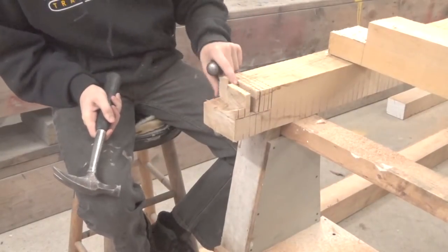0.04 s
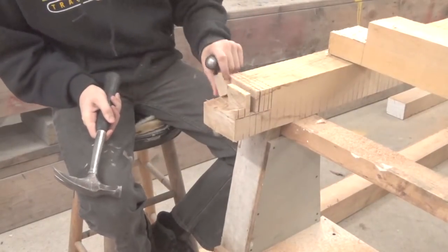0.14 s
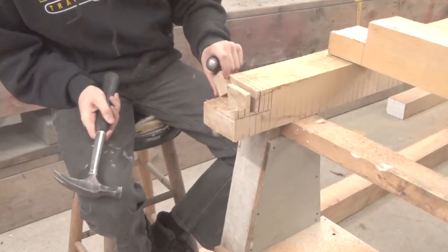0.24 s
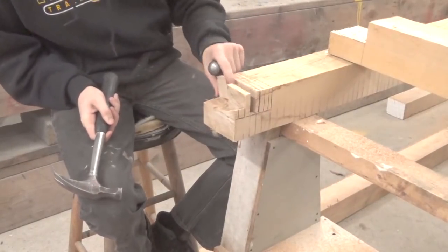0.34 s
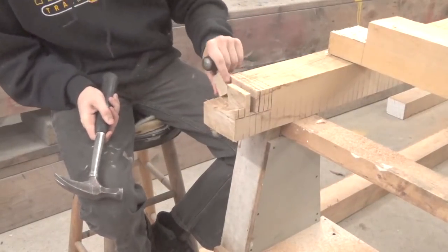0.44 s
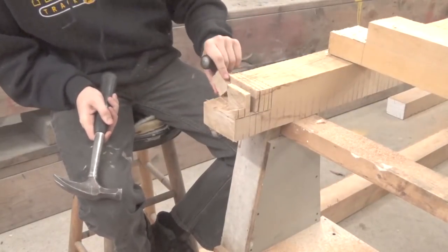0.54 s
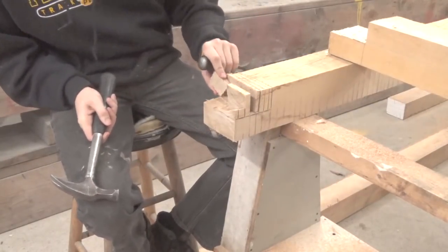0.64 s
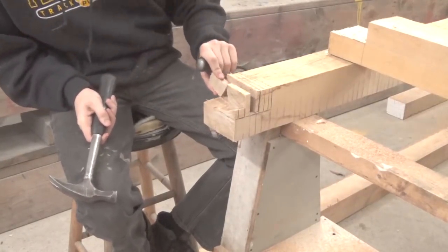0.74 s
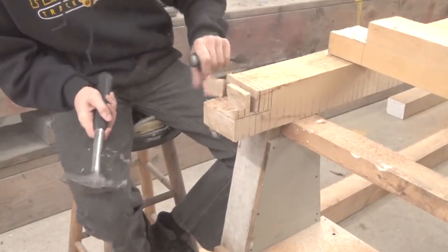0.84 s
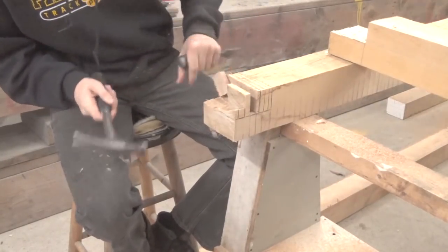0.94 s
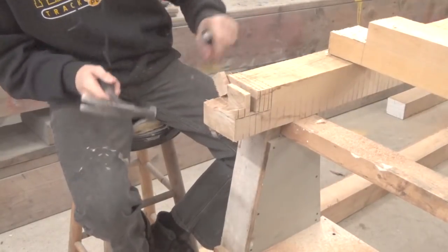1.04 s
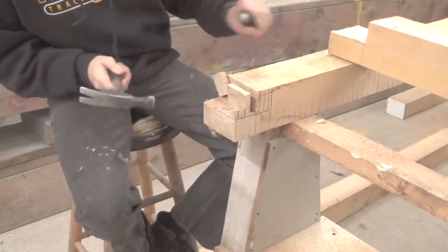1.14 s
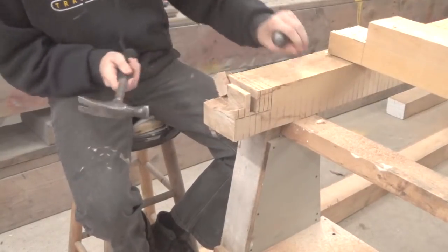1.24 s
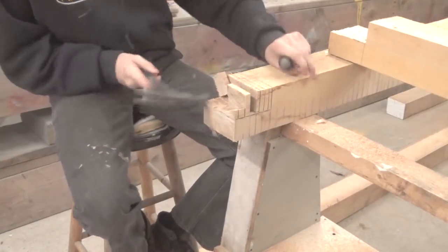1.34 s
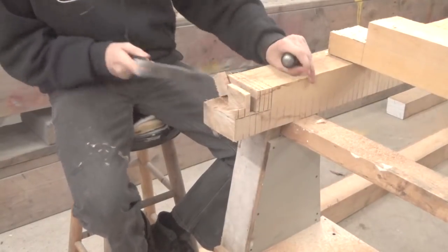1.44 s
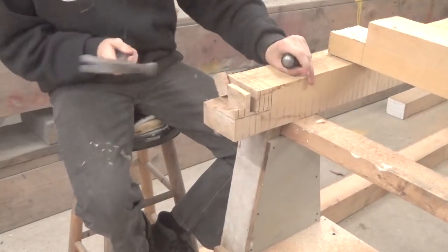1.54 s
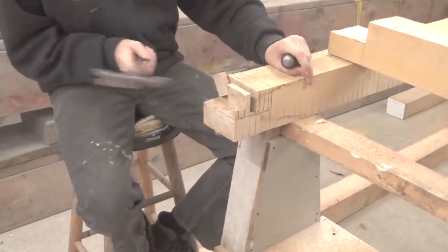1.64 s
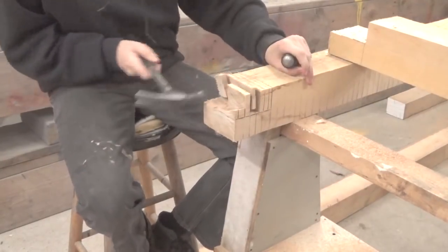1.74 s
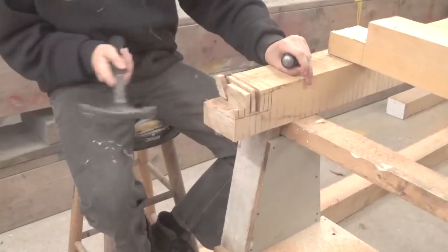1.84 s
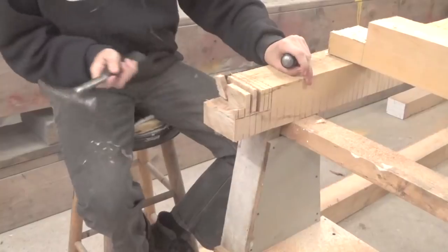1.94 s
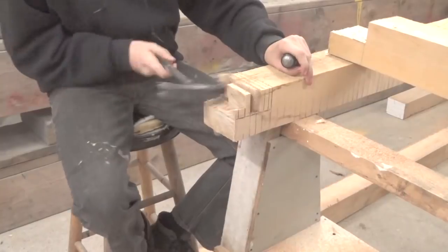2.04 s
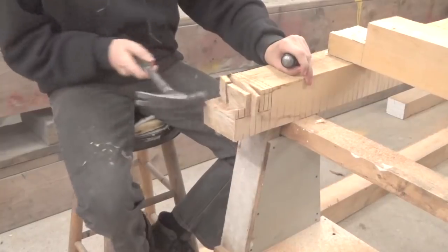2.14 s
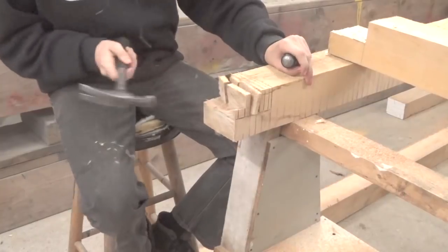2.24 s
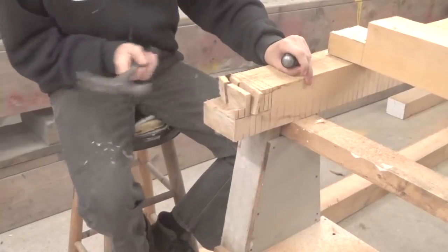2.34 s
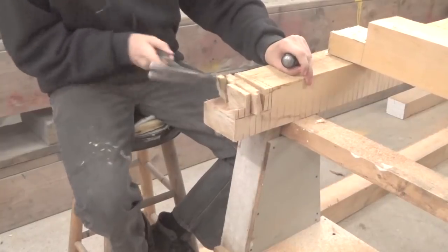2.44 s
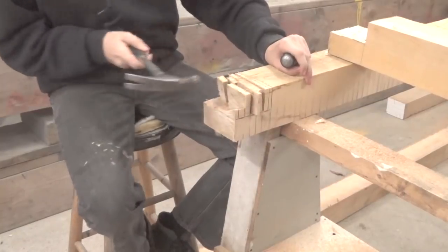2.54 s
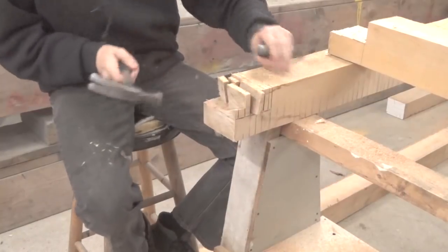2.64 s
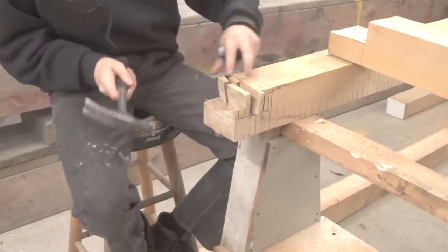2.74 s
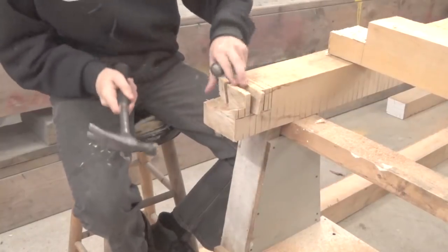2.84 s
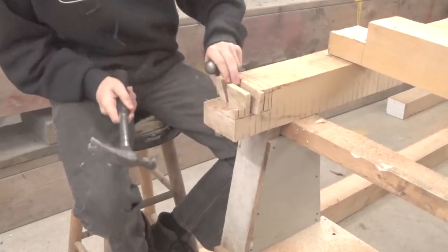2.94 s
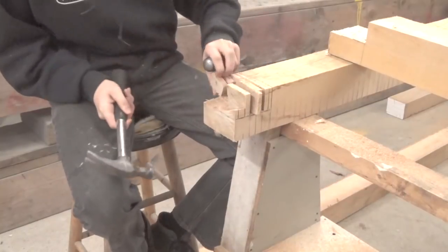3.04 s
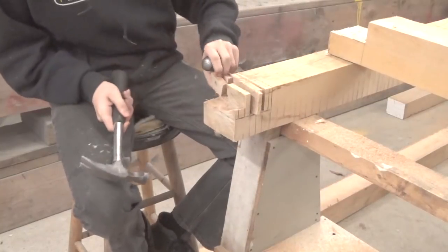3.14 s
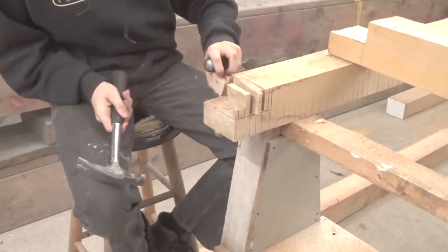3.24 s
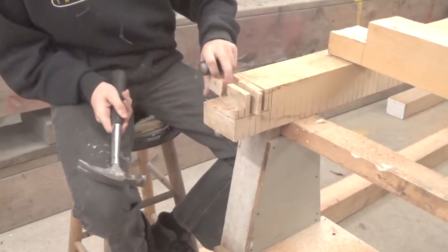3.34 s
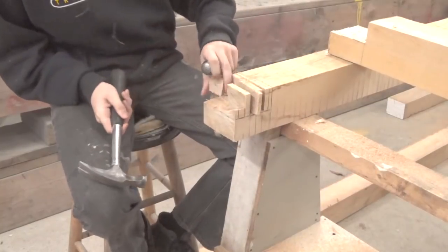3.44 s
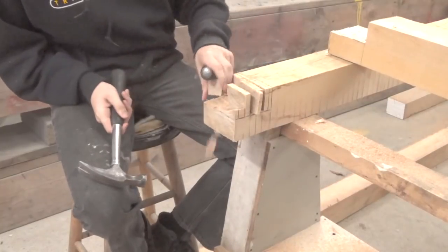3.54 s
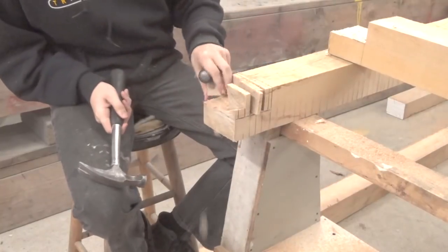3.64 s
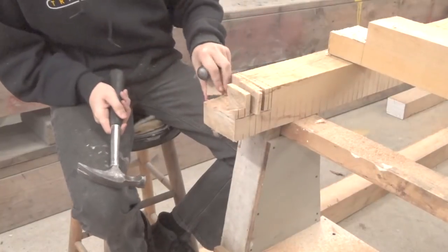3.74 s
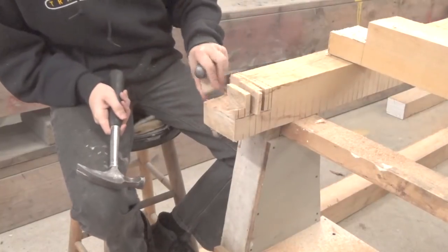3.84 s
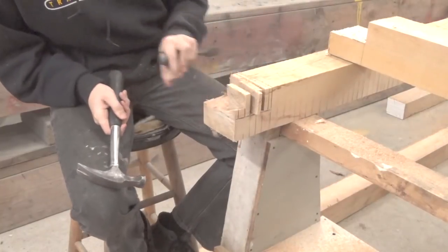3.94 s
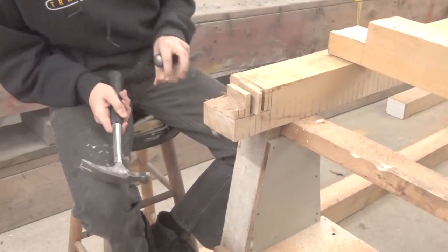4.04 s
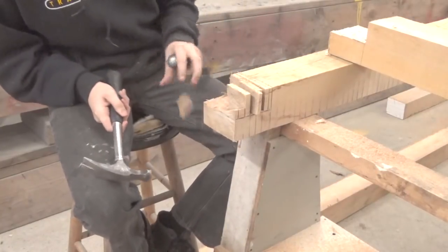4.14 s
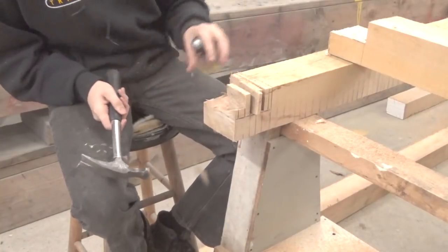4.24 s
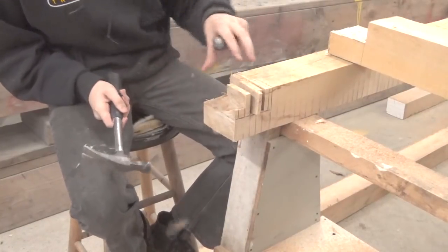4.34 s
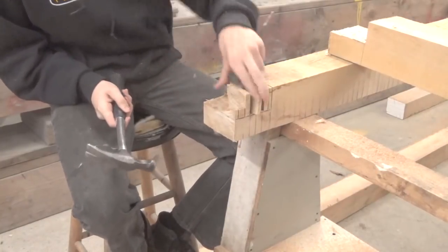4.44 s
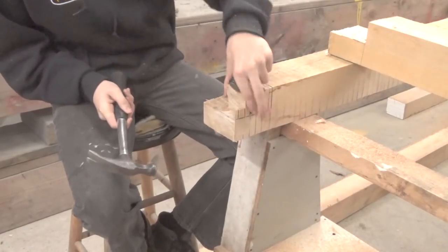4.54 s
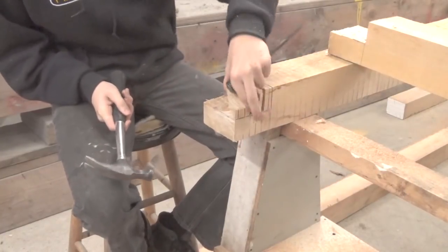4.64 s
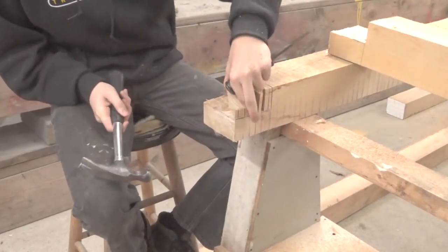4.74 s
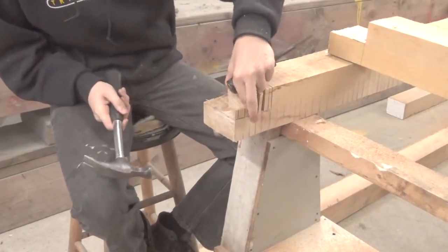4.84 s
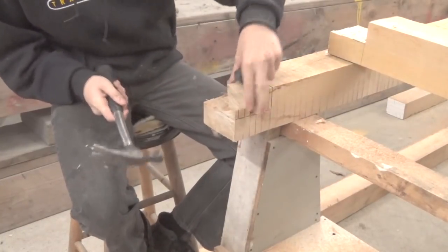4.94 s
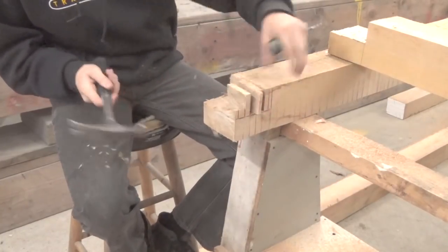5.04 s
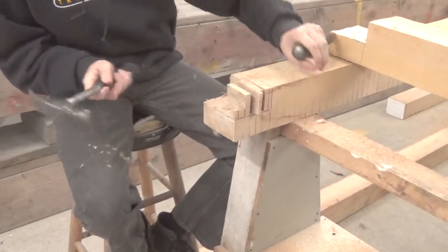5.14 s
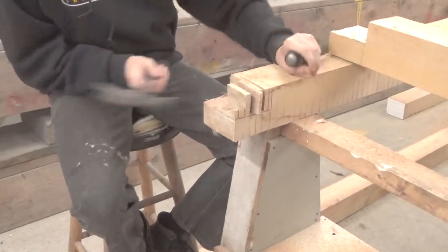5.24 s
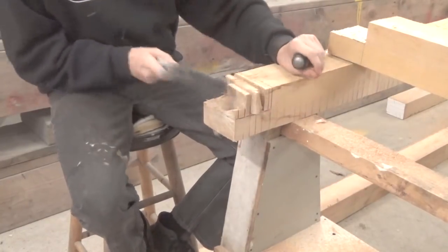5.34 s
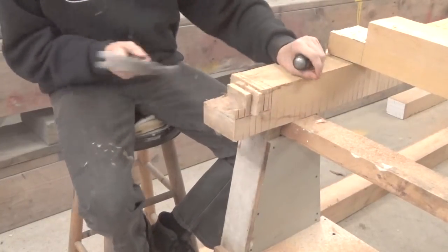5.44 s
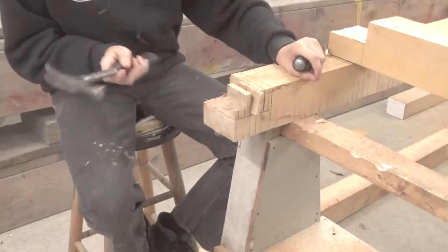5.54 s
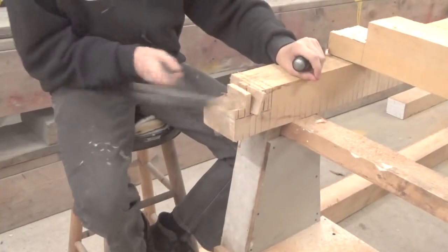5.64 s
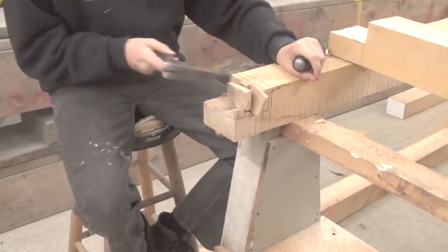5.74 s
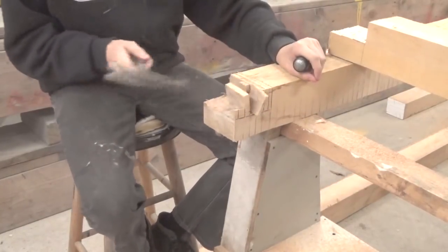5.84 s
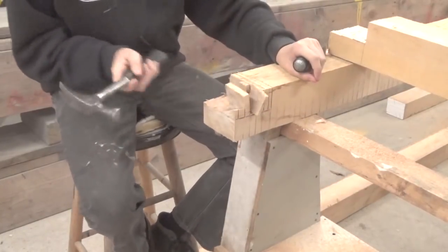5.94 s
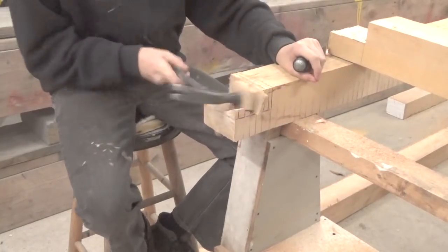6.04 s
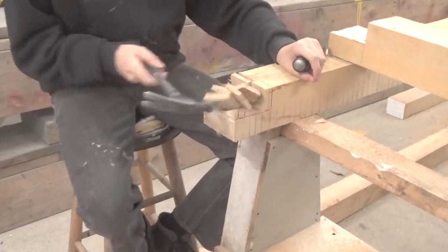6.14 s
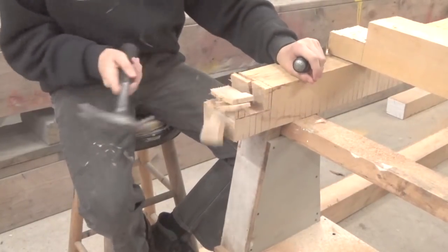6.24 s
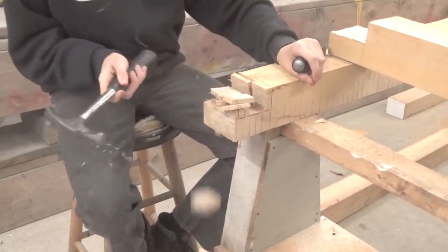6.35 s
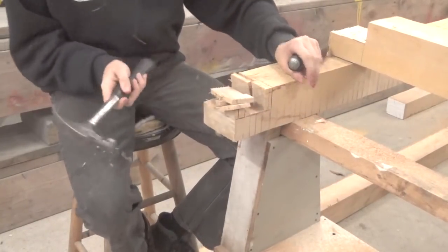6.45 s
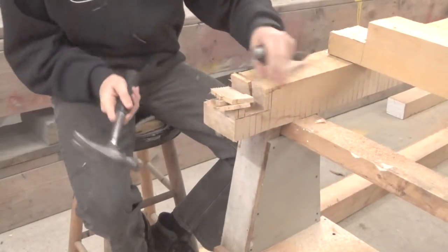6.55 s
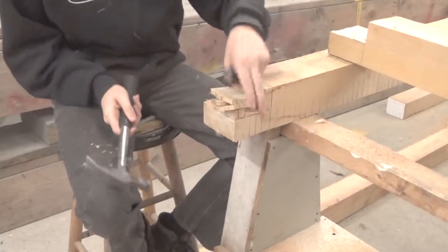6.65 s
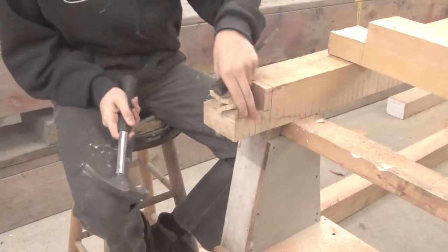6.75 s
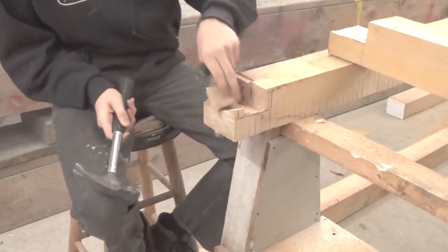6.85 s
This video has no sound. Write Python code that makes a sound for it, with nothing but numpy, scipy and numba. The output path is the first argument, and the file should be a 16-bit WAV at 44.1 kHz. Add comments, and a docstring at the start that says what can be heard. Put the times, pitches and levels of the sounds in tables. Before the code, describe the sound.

A hard-walled workshop with a faint steady room hiss, heard close in stereo. At 0 s a hammer blow cracks and its echo dies over about half a second; light ticks and a thin blade rub follow from 0.6 to 1.1 s. A duller, woody blow lands at 1.4 s, then sharper steel cracks at 1.7, 2.1 and 2.4 s, with a brief high squeal around 1.7 s. From 2.9 to 3.8 s there are small dry clicks and taps, a crisp snap at 3.85 s, a few chip ticks, a solid clack at 4.5 s and smaller knocks until 5.2 s. Three bright, very loud chisel blows ring at 5.3, 5.7 and 6.1 s, their echoes briefly flattened by limiting. At 6.6 s chips clatter sharply while a hand brushes shavings in a crackly swish to the end, near 7 s.

```python
"""A hard-walled workshop, where a claw hammer drives a chisel into a wooden beam.
Hammer blows and snapping, dropping chips are bursts of noise in colour bands, each starting room echoes.
Decaying modes ring the beam and chisel; resonant noise gives blade rubs, with a sine added for the squeal.
A hand brushes off waste as clumpy hiss with ticks, over a steady room tone.
The blows are so loud that the recorder's limiter flattens the first part of each echo tail."""
import sys
import numpy as np
from scipy import signal
from scipy.fft import rfft, irfft
from scipy.io import wavfile
from numba import njit

SR = 44100
rng = np.random.default_rng(int(sys.argv[2]) if len(sys.argv) > 2 else 0)


def write(x):
    x = np.atleast_2d(x).T
    wavfile.write(sys.argv[1], SR, np.round(np.clip(x, -1, 1) * 32767).astype(np.int16))


N = 304731

# All source levels are set ahead of the recorder's limiter and filters.
# Centres of the colour bands shared by contacts and echoes: centre_hz
BAND_CENTRES_HZ = [250, 600, 1500, 3000, 5500, 9000]
# Echoes of the hard-walled room, one row per colour band:
# centre_hz, t60_s, build_up_ms, left_right_likeness (0 to 1)
ROOM_BANDS = [(250, 0.5, 86, 0.98), (600, 0.56, 4.9, 0.88), (1500, 0.59, 6.2, 0.59), (3000, 0.56, 5, 0.67),
              (5500, 0.52, 1.2, 0.72), (9000, 0.41, 0.33, 0.86)]
# Colour of the room tone, before it is scaled to ROOM_TONE_DB: frequency_hz, density_db (per Hz)
ROOM_TONE_COLOUR = [(24, -52), (40, -8.5), (198, -8.5), (303, -8), (2040, -16.5), (2700, -19), (3110, -15),
                    (4130, -21.5), (9190, -12), (11100, -39.5), (14400, -52.5), (22000, -120)]
# Hand and sleeve brushing over wood, one list per stroke: time_s, level_db
BRUSH_STROKES = [
    [(0.56, -58), (1.092, -56), (1.23, -74), (1.286, -51), (1.37, -61)],
    [(1.62, -50), (1.73, -38)],
    [(2.95, -66), (3.512, -84), (3.57, -73)],
    [(4.05, -64), (4.368, -57), (4.48, -57.5)],
    [(6.6, -99), (6.664, -34), (6.802, -41), (6.9, -48)],
]
# Relative colour of the brushing hiss: frequency_hz, density_db (per Hz)
BRUSH_SPECTRUM = [(88, -42), (150, -19), (462, -16), (689, -13), (3060, 6.5), (7850, 7), (10900, -0.5),
                  (11500, -47), (15000, -61), (22000, -120)]
# Thin steel squeal, one list per stroke: time_s, level_db
SQUEAL_STROKES = [
    [(1.41, -32), (1.472, -41), (1.592, -60), (1.674, -34), (1.69, -22), (1.708, -19.5), (1.735, -28)],
    [(1.9, -37), (1.97, -47), (1.99, -35.5), (2.058, -55.5), (2.075, -38)],
]
# Blade rubbing on wood, one list per stroke: time_s, level_db
RUB_STROKES = [
    [(0.58, -73), (0.594, -55), (0.634, -67), (0.662, -48), (0.682, -60.5), (0.888, -50.5), (0.93, -62)],
    [(0.94, -59), (0.954, -40.5), (0.97, -43), (1.152, -72.5), (1.16, -65)],
]
# Narrow bands in which the blade sings: pitch_hz, width_hz (of each of two passes), level_db
BLADE_RESONANCES = [(3860, 400, -4), (4800, 320, -9), (7000, 700, -12), (9100, 600, -15)]
# Chips snapping, dropping and tools knocking, each a woody clack and a bright tick:
# start_s, clack_db, clack_pitch_hz, clack_fall_db (per octave away from the pitch),
# tick_db, echo_db (re the snap), length_ms (twice the swell time at 3000 Hz)
WOOD_KNOCKS = [(0.273, -33, 3320, 6.5, -55, -4, 0.69), (0.522, -53.5, 3000, 7, -48, -5, 4.4),
               (0.593, -46, 250, 5.5, -59, -8, 7.7), (0.799, -52.5, 1000, 8.5, -51, -0.5, 1.7),
               (0.865, -56.5, 3500, 5, -44.5, 6, 4.8), (0.918, -46, 1800, 5, -37, -14, 4.7),
               (1.094, -40, 244, 10.5, -68, -7.5, 5.7), (1.163, -47.5, 4200, 11, -68, 1, 1.9),
               (1.188, -46, 4160, 8.5, -53, 6, 1.7), (1.676, -26.5, 1040, 4.5, -33, 0.5, 0.86),
               (2.869, -42, 700, 2.5, -106, -9.5, 3.9), (2.979, -39.5, 470, 8, -54, -8.5, 3),
               (3.002, -62, 1200, 13, -41.5, -1.5, 1.2), (3.029, -45, 3500, 15, -37.5, -13, 5.1),
               (3.147, -71, 600, 4, -43.5, -11, 2.1), (3.169, -72, 1300, 3, -47, -21, 3.6),
               (3.278, -53.5, 250, 16, -52, -25, 9.7), (3.299, -55, 700, 18, -43.5, -14, 2.8),
               (3.379, -64, 250, 11, -53, -13, 3.3), (3.409, -49, 357, 5, -47, -16, 1.5),
               (3.44, -64, 600, 15, -55, -7, 3.6), (3.581, -27.5, 920, 20.5, -52, -13, 5.6),
               (3.607, -38.5, 700, 15, -60, -10.5, 8.5), (3.771, -41.5, 860, 9, -41, -10, 7.1),
               (3.825, -54, 2100, 0, -70, -5, 2.5), (3.853, -14.5, 2150, 24, -36, -15.5, 2.7),
               (3.88, -36, 600, 19, -34, -13, 1.5), (4.009, -53, 900, 3, -43, -41, 5.2),
               (4.038, -45, 2720, 5, -68, -15, 4.6), (4.052, -35.5, 2600, 6.5, -29, -16.5, 2.3),
               (4.106, -48.5, 276, 13, -70, -3.5, 2.8), (4.221, -68, 300, -2.5, -56, -2.5, 1.7),
               (4.306, -44.5, 250, 1, -44, -10, 4.9), (4.501, -19.5, 1340, 8, -64, -11.5, 5),
               (4.514, -10.5, 810, 14, -52, -13.5, 3.2), (4.602, -25.5, 900, 6, -23.5, -18.5, 1.3),
               (4.688, -31, 750, 17, -40.5, -30, 1.7), (4.743, -57.5, 500, -3, -58, -14, 3.1),
               (4.871, -34, 920, 14.5, -41.5, -11.5, 5.6), (4.907, -45, 2200, 11, -49, -3, 4.8),
               (4.962, -48.5, 250, 13, -56, 8, 6.5), (5.005, -23, 3000, 11.5, -47, -17.5, 0.86),
               (5.193, -24, 990, 3, -48, -14.5, 3.6), (6.525, -36, 2600, 9, -79, -14, 0.8),
               (6.617, -26.5, 2490, 9.5, -15, -7.5, 1.8), (6.623, -21, 5500, 14, -20, -4.5, 1.6),
               (6.633, -34.5, 2763, 4.5, -37, -4.5, 1.2), (6.692, -39, 1100, 7, -40, -9, 1.9),
               (6.732, -27.5, 4260, 6, -45, -8.5, 6.4), (6.741, -28, 1297, 4.5, -24.5, -6, 1.8),
               (6.769, -17, 1500, 23, -26, -15, 3.5)]
# Blows and touches that set the chisel ringing:
# start_s, level_db, favoured_pitch_hz, fall_db (per octave away from it)
CHISEL_STRIKES = [(2.085, -1.5, 1690, 22), (2.445, -17, 2780, 21), (2.87, -50, 2640, 32),
                  (3.583, -51.5, 2620, 40), (3.853, -34, 1920, 28), (5.006, -27.5, 4070, 53),
                  (4.964, -44, 4660, 23), (6.527, -43, 4840, 24), (5.194, -39.5, 1710, 5),
                  (5.332, -2, 2280, 39), (5.704, -8.5, 2900, 3), (6.089, -3, 3260, 21.5),
                  (6.618, -39, 4320, 10)]
# Ringing modes of the chisel: pitch_hz, level_db, t60_s
CHISEL_MODES = [(1740, -17, 0.084), (1804, -1.5, 0.04), (2100, 4.5, 0.016), (2265, -5.5, 0.049),
                (2670, -3.5, 0.063), (2870, -7, 0.014), (2895, -2.5, 0.024), (3490, -10, .025),
                (3680, -5, 0.033), (4275, -3, 0.037), (4930, -7.5, 0.038), (6250, -6, .015)]
# Blows and taps that set the beam ringing:
# start_s, level_db, favoured_pitch_hz, fall_db (per octave away from it)
BEAM_STRIKES = [(0.002, -41, 820, 29), (0.594, -51, 210, 22), (1.095, -56, 235, 8), (1.390, -14, 430, 0.5),
                (1.731, -6, 745, 21), (2.085, -9, 810, 13), (2.445, -11.5, 800, 11.5),
                (2.98, -52.5, 490, 16), (3.41, -57.5, 494, 12), (3.583, -40.5, 1180, 27),
                (4.306, -54, 402, 31), (4.503, -32.5, 450, 6), (5.194, -34.5, 610, 40),
                (5.332, -15, 594, 3.5), (5.704, -18.5, 570, 4.5), (6.089, -13, 796, 19),
                (6.771, -33, 790, 22)]
# Ringing modes of the wooden beam: pitch_hz, level_db, t60_s
BEAM_MODES = [(212, -5.5, 0.11), (422, 2.5, 0.11), (485.6, -14, 0.25), (614, -1, 0.099),
              (792.6, -3.5, 0.051), (844.7, -1.5, 0.12), (1059, -16, 0.29), (1220, -7, 0.076),
              (1606, -6, 0.078), (1670, -10, 0.04), (2090, -39, 0.08), (2744, -3, 0.026)]
# Hammer blows: start_s, crack_db (direct, re the echoes), echo_db (at the knee), knee_hz,
# fall_below_db (per octave), fall_above_db (per octave)
HAMMER_BLOWS = [(0.001, 2.3, -24, 2780, 6.9, 2.8), (1.389, 1.1, -13, 810, 2.9, 6.46),
                (1.731, 10.4, -13, 586, 8.2, 0.14), (2.083, 8.7, -9, 2400, 10.4, .1),
                (2.443, 9.1, -15.5, 700, 54, 0.037), (5.331, 8.7, -4.5, 3440, 5.2, 0.09),
                (5.703, 8.6, -5.5, 4860, 4.7, .1), (6.086, 9.4, -10, 3350, 8.7, 0.064)]

ROOM_TONE_DB, SQUEAL_HZ = -59, 8880
# Shavings ticking under the hand: average rate, mean tick gain re the hiss, decay time constant
CRUMBS_PER_S, CRUMB_DB, CRUMB_DECAY_MS = 26, -0.5, 5.3
TICK_FALL_DB = 13  # per octave below the top band
CRACK_THIN_DB = 4.5  # bass the crack lacks, per octave below 1500 Hz
BEAM_ECHO_DB, CHISEL_ECHO_DB, RUB_ECHO_DB = -39, -37, -44  # drive gains into the room echoes
ATTACK_MS, RELEASE_MS, AHEAD_MS = 0.77, 37.6, 1.2
LIMIT_DB, CLIP_CEILING, CUTOFF_HZ = -8, 0.52, 10900


def amp(db):
    """Turn decibels into linear gain."""
    return 10 ** (np.asarray(db) / 20)


def rms_one(x):
    """Scale a sound to unit rms."""
    return x / np.sqrt(np.mean(x ** 2) + 1e-20)


def stroke_gain(strokes):
    """Draw the gain of all strokes, interpolated in dB; each is at -120 dB outside its span."""
    t = np.arange(N) / SR
    gain = np.zeros(N)
    for stroke in strokes:
        time_s, level_db = np.transpose(stroke)
        gain += amp(np.interp(t, time_s, level_db, -120, -120))
    return gain


def stereo(mid, side, alike):
    """Spread two independent noises over left and right; likeness 1 leaves only the middle."""
    return np.sqrt(1 + alike) * mid + np.sqrt(1 - alike) * side * [[1], [-1]]


def coloured(spectrum, alike):
    """Shape white noise to a spectrum and spread it in stereo, at unit rms."""
    hz, level_db = np.transpose(spectrum)
    grid = np.fft.rfftfreq(N, 1 / SR) + 1
    gain = amp(np.interp(np.log(grid), np.log(hz), level_db))
    mid, side = irfft(rfft(rng.standard_normal((2, N))) * gain, N)
    return rms_one(stereo(mid, side, alike))


def resonance(x, hz, width_hz):
    """Ring a sound through a two-pole peak with a gain of about 1 at its pitch."""
    r = np.exp(-np.pi * width_hz / SR)
    feedback = [1, -2 * r * np.cos(2 * np.pi * hz / SR), r * r]
    return signal.lfilter((1 - r * r) / 2 * np.array([1, 0, -1]), feedback, x)


def double_resonance(x, hz, width_hz):
    """Pass a sound twice through the same peak for steeper skirts."""
    return resonance(resonance(x, hz, width_hz), hz, width_hz)


def band_noise(k, size, channels=1):
    """Filter white noise to band k, with edges midway in pitch to its neighbours, at unit rms."""
    centres = np.r_[150, BAND_CENTRES_HZ, 16000]
    edges = np.sqrt(centres[k:k + 2] * centres[k + 1:k + 3])
    sos = signal.butter(2, edges, "band", fs=SR, output="sos")
    white = rng.standard_normal((channels, size + 500))
    return rms_one(signal.sosfilt(sos, white)[:, 500:])  # skip the filter's start


def stereo_band_noise(k, size):
    """Spread noise of band k over two partly different channels, as the room does."""
    mid, side = band_noise(k, size, channels=2)
    return stereo(mid, side, ROOM_BANDS[k][3])


def echo_envelope(k):
    """Shape how the echoes of band k build up and die away."""
    t = np.arange(SR) / SR
    _, t60_s, build_up_ms, _ = ROOM_BANDS[k]
    return amp(-60 * t / t60_s) * (1 - np.exp(-t * 1000 / build_up_ms))


def fresh_echoes(clicks, k, noise):
    """Start an echo tail at every click; the energies of overlapping tails add."""
    energy = signal.fftconvolve(clicks ** 2, echo_envelope(k) ** 2)[:N]
    return np.sqrt(np.abs(energy)) * noise


def workshop():
    """Build the dense noise tail with which the room answers a click."""
    return sum(echo_envelope(k) * stereo_band_noise(k, SR) for k in range(len(ROOM_BANDS)))


def echoed(x, echo):
    """Play a sound through the room by convolving it with the echo tail."""
    return signal.fftconvolve(x[None], echo, axes=1)[:, :N]


def contacts(start_s, direct_db, echo_db, length_ms):
    """Swell and fade a noise burst per band, slower in the bass, and start echoes in that band."""
    direct, echoes = np.zeros((1, N + 4000)), np.zeros((2, N))
    t_ms = np.arange(4000) / SR * 1000
    starts = (start_s * SR).astype(int)
    for k, hz in enumerate(BAND_CENTRES_HZ):
        for i, level_db, ms in zip(starts, direct_db[:, k], np.maximum(length_ms, 0.3)):
            age = 2 * t_ms / ms * (hz / 3000) ** 0.12
            shape = age * np.exp(1 - age)
            # Every random burst carries the exact energy of its envelope.
            burst = rms_one(shape * band_noise(k, 4000)) * np.sqrt(np.mean(shape ** 2))
            direct[:, i:i + 4000] += amp(level_db) * burst
        clicks = np.zeros(N)
        clicks[starts] = amp(echo_db[:, k])
        echoes += fresh_echoes(clicks, k, stereo_band_noise(k, N))
    return echoes + direct[:, :N]


def struck(strikes, modes, echo_db):
    """Ring decaying modes, favouring those near each strike's pitch; the room answers in the same modes."""
    start_s, strike_db, favoured_hz, fall_db = np.transpose(strikes)
    starts = (start_s * SR).astype(int)
    ring = np.zeros((2, N))
    spread_db = rng.normal(0, 1.5, (len(starts), len(modes)))
    noise = [stereo_band_noise(k, N) for k in range(len(ROOM_BANDS))]
    for m, (hz, level_db, t60_s) in enumerate(modes):
        band = np.argmin(np.abs(np.log(hz / np.array(BAND_CENTRES_HZ))))
        distance = np.abs(np.log2(hz / favoured_hz))  # octaves
        clicks = np.zeros(N)
        clicks[starts] = amp(strike_db + level_db - fall_db * distance + spread_db[:, m])
        drive = clicks + amp(echo_db) * fresh_echoes(clicks, band, noise[band])
        r, w = amp(-60 / (t60_s * SR)), 2 * np.pi * hz / SR
        feedback = [1, -2 * r * np.cos(w), r * r]
        ring += signal.lfilter([0, np.sin(w)], feedback, drive + 1e-18)  # tiny offset
    return ring


def room_tone():
    """Lay a steady, diffuse noise bed of fixed colour."""
    return amp(ROOM_TONE_DB) * coloured(ROOM_TONE_COLOUR, alike=0.7)


def brush():
    """Brush soft hiss in uneven clumps as loose shavings catch, with brief ticks on it."""
    clumps = amp(3.2 * rms_one(double_resonance(rng.standard_normal(N), 45, 70)))
    ticks = (rng.random(N) < CRUMBS_PER_S / SR) * amp(CRUMB_DB + rng.normal(0, 2.8, N))
    crumbs = signal.lfilter([1], [1, -np.exp(-1000 / (CRUMB_DECAY_MS * SR))], ticks)
    hiss = coloured(BRUSH_SPECTRUM, alike=0.75)
    return stroke_gain(BRUSH_STROKES) * rms_one((clumps + crumbs) * hiss)


def squeal():
    """Squeal thin steel as a sine roughened by narrow resonant noise at the same pitch."""
    rough = rms_one(double_resonance(rng.standard_normal(N), SQUEAL_HZ, 90))
    tone = np.sin(2 * np.pi * SQUEAL_HZ * np.arange(N) / SR)
    return stroke_gain(SQUEAL_STROKES) * rms_one(tone + 1.3 * rough)


def rub():
    """Rub the blade on wood: friction noise twice through each of the blade's resonances."""
    white = rng.standard_normal(N)
    sung = np.zeros(N)
    for hz, width_hz, level_db in BLADE_RESONANCES:
        sung += amp(level_db) * rms_one(double_resonance(white, hz, width_hz))
    return stroke_gain(RUB_STROKES) * sung


def knocks():
    """Snap waste wood short and dry: less bass arrives directly, and the echoes are duller."""
    columns = np.array(WOOD_KNOCKS).T[:, :, None]
    start_s, clack_db, clack_hz, fall_db, tick_db, echo_db, length_ms = columns
    hz = np.array(BAND_CENTRES_HZ)
    clack = amp(clack_db - fall_db * np.abs(np.log2(hz / clack_hz)))
    tick = amp(tick_db - TICK_FALL_DB * np.log2(hz[-1] / hz))
    snap_db = 10 * np.log10(clack ** 2 + tick ** 2)
    octaves = np.log2(hz / 1500)
    direct_db = snap_db + 1.5 * np.minimum(octaves, 0)
    room_db = snap_db + echo_db - 2.9 * np.maximum(octaves, 0)
    return contacts(start_s[:, 0], direct_db, room_db, length_ms[:, 0])


def chisel():
    """Ring the chisel's steel modes and their answer from the room."""
    return struck(CHISEL_STRIKES, CHISEL_MODES, CHISEL_ECHO_DB)


def beam():
    """Ring the beam's wooden modes and their answer from the room."""
    return struck(BEAM_STRIKES, BEAM_MODES, BEAM_ECHO_DB)


def hammer():
    """Crack steel on steel, with direct bursts thinned in the bass and echoes tilted around a knee."""
    columns = np.array(HAMMER_BLOWS).T[:, :, None]
    start_s, crack_db, level_db, knee_hz, below_db, above_db = columns
    hz = np.array(BAND_CENTRES_HZ)
    octaves = np.log2(hz / knee_hz)
    echo_db = level_db + below_db * np.minimum(octaves, 0) - above_db * np.maximum(octaves, 0)
    thin_db = CRACK_THIN_DB * np.minimum(np.log2(hz / 1500), 0)
    return contacts(start_s[:, 0], crack_db + echo_db + thin_db, echo_db, np.full(len(start_s), 3.5))


def scene():
    """Mix the diffuse bed and hand sounds with the tools, wood and their room echoes."""
    blade = rub()
    blade_in_room = blade + amp(RUB_ECHO_DB) * echoed(blade, workshop())
    background = room_tone() + brush() + squeal()
    return background + blade_in_room + knocks() + chisel() + beam() + hammer()


@njit
def follow(peak, attack, release):
    """Follow the level, quick up and slower down."""
    out, level = np.empty_like(peak), 0.
    for i in range(len(peak)):
        level += (peak[i] - level) * (attack if peak[i] > level else release)
        out[i] = level
    return out


def record(dry):
    """Limit both channels together with slight look-ahead, round the peaks, thin bass and cut top."""
    attack, release = min(1, 1000 / (ATTACK_MS * SR)), 1000 / (RELEASE_MS * SR)
    level = follow(np.abs(dry).max(axis=0), attack, release)
    ahead = round(AHEAD_MS * SR / 1000)
    level_ahead = np.r_[level[ahead:], level[-ahead:]]
    limited = dry / np.maximum(1, level_ahead / amp(LIMIT_DB))
    rounded = CLIP_CEILING * np.tanh(limited / CLIP_CEILING)
    thin = signal.sosfilt(signal.butter(2, 215, "high", fs=SR, output="sos"), rounded)
    return signal.sosfilt(signal.ellip(10, 0.5, 70, CUTOFF_HZ, fs=SR, output="sos"), thin)


dry = scene()
out = record(dry)
write(out)
```